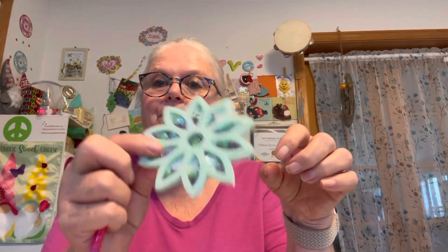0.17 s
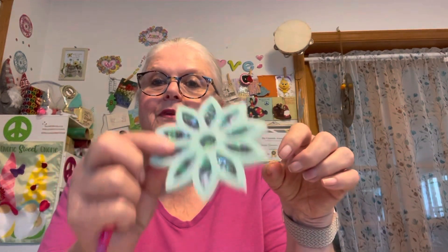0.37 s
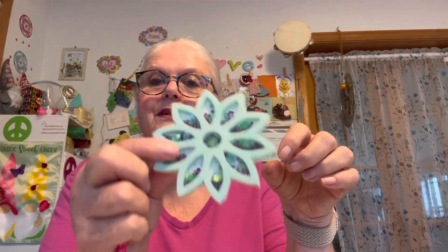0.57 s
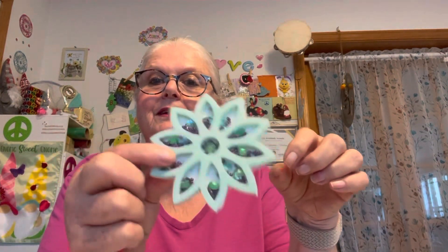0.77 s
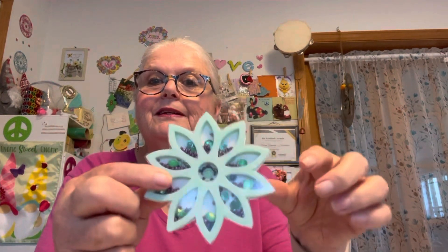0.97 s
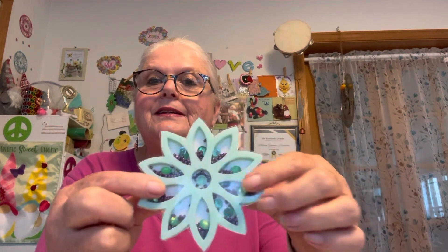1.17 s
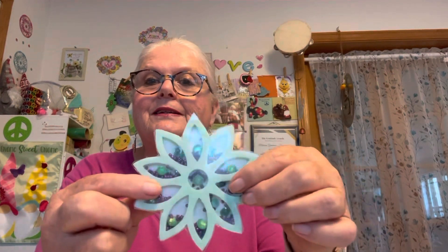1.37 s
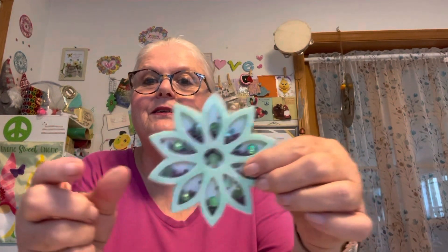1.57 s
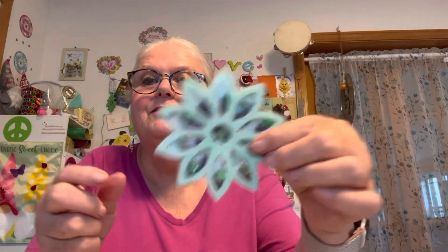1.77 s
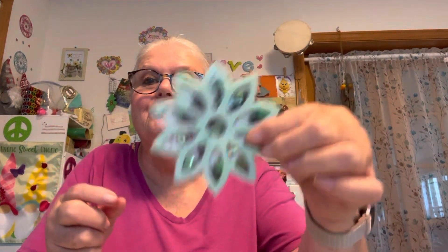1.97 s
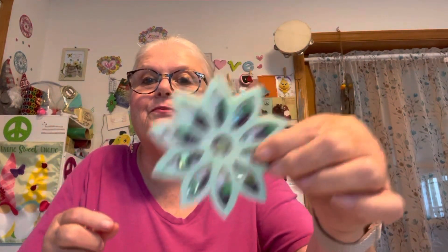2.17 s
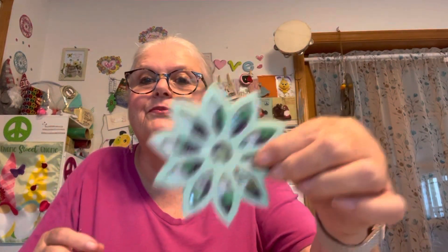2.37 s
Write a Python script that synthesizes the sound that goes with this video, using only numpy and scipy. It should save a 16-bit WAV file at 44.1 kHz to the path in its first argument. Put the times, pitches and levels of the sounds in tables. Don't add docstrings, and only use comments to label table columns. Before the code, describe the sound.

Small gems rattle inside a flat paper-and-film shaker, flicked quickly for a second, settling to a few stray ticks and a fingernail tap, then shaken again, close to a stereo microphone in a quiet room.

```python
import sys
import numpy as np
from scipy import signal
from scipy.fft import rfft, irfft, next_fast_len
from scipy.io import wavfile

SR = 44100
rng = np.random.default_rng(int(sys.argv[2]) if len(sys.argv) > 2 else 0)


def to_wav(sig):
    pcm = np.clip(np.atleast_2d(sig), -1, 1) * 32767
    pcm = np.round(pcm).astype(np.int16)
    wavfile.write(sys.argv[1], SR, pcm.T)


def to_linear_factor(level_db):
    exponent = np.asarray(level_db, float) / 20
    return 10 ** exponent


N = 106589
GRAIN = 1024


def evened(x):
    return x / np.sqrt(np.mean(x ** 2) + 1e-20)


def read(points, hz):
    f, value = np.transpose(points)
    return np.interp(np.log(hz + 1), np.log(f + 1), value)


def add(mix, s, sound):
    part = mix[..., round(s * SR):][..., :sound.shape[-1]]
    part += sound[..., :part.shape[-1]]


# (frequency [Hz], density [dB per Hz])
HISS = [(20, -40), (45, -1), (100, -13), (300, -17), (700, -28), (1400, -32), (7000, -36), (15500, -48)]
# (frequency [Hz], likeness [0-1])
HISS_LIKENESS = [(40, .85), (150, .5), (600, .4), (2000, .1), (15000, .1)]
# (frequency [Hz], level [dB], phase [rad])
HUM = [(40, -81, 1.5), (48.4, -77, 3), (59, -81, 4.5), (118.4, -85, .3)]


def floor():
    hiss_db = -71
    hz, t = np.fft.rfftfreq(N, 1 / SR), np.arange(N) / SR
    first, second = rfft(rng.standard_normal((2, N)))
    same = np.clip(read(HISS_LIKENESS, hz), 0, 1)
    other_port = same * first + np.sqrt(1 - same ** 2) * second
    hiss = irfft(np.array([first, other_port]) * to_linear_factor(read(HISS, hz)), N)
    hum = sum(to_linear_factor(db + 3) * np.sin(2 * np.pi * f * t + phase) for f, db, phase in HUM)
    return to_linear_factor(hiss_db) * evened(hiss) + hum


# (time [s], peak level [dB], frequency [Hz], length [s])
BUMPS = [(.44, -52, 150, .07), (.45, -56, 50, .08), (.39, -60, 380, .04), (.62, -60, 350, .04),
         (.83, -63, 350, .04), (1.05, -57, 140, .07), (1.1, -61, 60, .05), (1.315, -55, 290, .045),
         (1.32, -58, 90, .08), (1.805, -55, 280, .045), (1.81, -60, 120, .05), (2.0, -57, 330, .035),
         (2.195, -64, 400, .03), (2.385, -61, 350, .04)]


def bumps():
    out = np.zeros((2, N))
    for s, db, hz, length in BUMPS:
        t = np.arange(0, 2 * length, 1 / SR)
        shared, left, right = rng.standard_normal((3, 8000))
        band = signal.butter(2, [.6 * hz, 1.4 * hz], "bandpass", fs=SR, output="sos")
        noise = signal.sosfilt(band, [shared + .5 * left, shared + .5 * right])
        noise = evened(noise)[:, -len(t):]
        swell = (t / length * 3) * np.exp(1 - t / length * 3)
        add(out, s, to_linear_factor(db) * noise * swell / 2)
    return out


# (frequency [Hz], left minus right [dB])
TILT = [(300, -2), (700, -6), (1100, -4), (1700, 0.3), (3000, -.7), (4200, 2.5), (6500, 3.5), (8000, 0)]
# (frequency [Hz], likeness [0-1])
ALIKE = [(400, .6), (1000, .9), (2900, .88), (3600, .6), (5000, .45), (6000, .7), (7000, .1), (16000, .05)]


def ports(x, other):
    lag_s = .000156
    thin_hz = 1000
    size = len(x) + 64
    hz = np.fft.rfftfreq(size, 1 / SR)
    half_tilt = to_linear_factor(read(TILT, hz) / 2)
    same = np.clip(read(ALIKE, hz), 0, 1)
    right = rfft(x, size)
    left = same * right * np.exp(-2j * np.pi * hz * lag_s) + np.sqrt(1 - same ** 2) * rfft(other, size)
    radiation = 1 / np.sqrt(1 + (thin_hz / (hz + 1)) ** 4)
    return irfft(np.array([left * half_tilt, right / half_tilt]) * radiation, size)[:, :len(x)]


# (frequency [Hz], level [dB], t60 [s])
WALL_MODES = [(400, -18, .02), (830, -18, .015), (1200, -13, .01), (1750, 0, .008), (2150, 0, .008),
              (2750, 2, .011), (3500, -2, .007), (4200, -2, .006), (4600, -5, .005), (5600, -5, .006),
              (6100, -3, .007), (7300, -10, .004)]
# (frequency [Hz], level [dB])
TICK = [(300, -40), (680, -38), (1300, -10), (1900, -1), (3000, -1), (6000, -4), (8500, -6), (16000, -11)]


def click(lift_hz=0, lift_db=0):
    rise_s, tick_t60_s = .0006, .0035
    buzz_db, buzz_t60_s = -13, .035
    ring_db, mode_spread_db, detuning = 1.5, 7, .05
    t, hz = np.arange(GRAIN) / SR, np.fft.rfftfreq(GRAIN, 1 / SR)
    rise = np.minimum(t / rise_s, 1) ** 2
    decay = to_linear_factor(-60 * t / tick_t60_s) + to_linear_factor(buzz_db - 60 * t / buzz_t60_s)
    shape = rise * decay * np.cos(np.pi / 2 * t / t[-1])
    tick = irfft(rfft(rng.standard_normal((2, GRAIN)) * shape) * to_linear_factor(read(TICK, hz)), GRAIN)

    f, db, t60 = np.transpose(WALL_MODES)[:, :, None]
    detune, share, phase, other_phase = rng.standard_normal((4, len(WALL_MODES), 1))
    distance = abs(f - lift_hz)
    db = db + mode_spread_db * share + lift_db * (distance == distance.min())
    turns = f * (1 + detuning * detune) * t + np.array([phase, other_phase])
    ring = rise * (to_linear_factor(db - 60 * t / t60) * np.sin(2 * np.pi * turns)).sum(1)

    both = evened(tick) + to_linear_factor(ring_db) * evened(ring)
    both = np.roll(both, 24, axis=1)
    return ports(*(both / np.linalg.norm(both[0])))


# (time [s], level [dB], frequency [Hz], rise [s], t60 [s])
TAP = (1.2632, -18, 2900, .0018, .007)


def tap():
    out = np.zeros((2, N))
    s, db, hz, rise, t60 = TAP
    t = np.arange(GRAIN) / SR
    ring = to_linear_factor(db - 60 * t / t60) * np.minimum(t / rise, 1) ** 2 * np.sin(2 * np.pi * hz * t)
    add(out, s, ports(ring, ring))
    return out


# (time [s], peak level [dB], ring frequency [Hz])
DROPS = [(0.0343, -40, 1660), (0.1166, -45, 2970), (0.4124, -27, 1860), (0.4644, -40, 3450),
         (0.4754, -43, 5730), (0.5057, -40, 1900), (0.6883, -40, 2740), (0.7033, -39, 1820),
         (0.826, -24, 5780), (0.9148, -40, 2720), (0.9742, -47, 1700), (1.0331, -56, 2780),
         (1.2311, -55, 4950), (1.2724, -55, 3320), (1.2784, -50, 2870), (1.2864, -50, 2880),
         (1.3803, -46, 2850), (1.4262, -48, 2760), (1.476, -52, 1760), (1.488, -42, 2700),
         (1.5184, -39, 3640), (1.5289, -35, 2760), (1.5713, -39, 5630), (1.6054, -38, 2170),
         (1.6137, -33, 5880), (1.6636, -42, 2160), (1.695, -41, 2550), (2.0434, -28, 2000),
         (2.0814, -43, 1550), (2.3905, -24, 5630)]


def drops():
    out = np.zeros((2, N))
    for s, db, hz in DROPS:
        one = click(hz, lift_db=9)
        add(out, s - .001, to_linear_factor(db + 5) * one / abs(one).max())
    return out


# (peak time [s], level [dB], build-up [s per 20 dB], dying [s per 20 dB])
SWARMS = [(.015, -55, .05, .05), (.055, -49, .04, .06), (.157, -38, .025, .06), (.21, -44, .06, .07),
          (.32, -44, .02, .05), (.35, -45, .04, .06), (.418, -37, .06, .05), (.529, -50, .015, .06),
          (.565, -48, .05, .07), (.637, -38, .06, .035), (.71, -61, .08, .08), (.77, -41, .03, .05),
          (.828, -37, .02, .05), (.87, -53, .05, .12), (1.08, -66, .1, .02), (1.32, -59, .03, .08),
          (1.41, -66, .08, .04), (1.53, -54, .055, .1), (1.612, -54, .05, .05), (1.69, -56, .1, .07),
          (1.745, -41, .035, .06), (1.815, -40, .05, .06), (1.92, -48, .03, .1), (2.015, -36, .1, .05),
          (2.128, -45, .015, .05), (2.16, -45, .04, .06), (2.2, -39, .02, .09), (2.317, -44, .01, .06),
          (2.35, -46, .04, .06), (2.395, -38, .035, .06)]


def swarms(count=32):
    full_rate, full_db = 6000, -38
    density, size_db, level_db = .28, 4.6, 5.3
    t = np.arange(N) / SR
    power = np.zeros(N)
    for s, db, up, down in SWARMS:
        distance = np.where(t < s, (s - t) / up, (t - s) / down)
        power += to_linear_factor(2 * db - 40 * distance)
    busy = np.clip(power / to_linear_factor(2 * full_db), 1e-9, 1) ** (density / 2)
    rate = busy * full_rate
    struck = rng.random(N) < rate / SR
    kind = rng.integers(0, count, N)
    size = to_linear_factor(size_db * np.minimum(rng.exponential(1, N), 4)) * rng.choice([-1., 1.], N)
    hits = evened(size) * struck * np.sqrt(power * SR / rate)
    out = np.zeros((2, N))
    for k in range(count):
        out += signal.oaconvolve((hits * (kind == k))[None], click(), axes=1)[:, :N]
    return to_linear_factor(level_db) * out


def tail(x, t60, gap_s):
    t = np.arange(SR // 2) / SR
    sparse = rng.standard_normal((2, len(t))) * (rng.random((2, len(t))) < .1)
    taps = sparse * to_linear_factor(-60 * t / t60) * (t > gap_s)
    taps = signal.lfilter([.5, .5], [1], taps)
    return signal.fftconvolve(x, taps / np.linalg.norm(taps[0]), axes=1)[:, :N]


def scene():
    gems = swarms() + drops() + tap()
    room = to_linear_factor(-17.5) * tail(gems, t60=.18, gap_s=.004)
    return gems + room + bumps() + floor()


def roll_off(x):
    return signal.sosfilt(signal.butter(12, 15720, fs=SR, output="sos"), x)


def record(dry):
    edge_hz = 15750
    lean_s, lean_hz, lean_from_hz, lean_db = .00019, 11580, 7500, 24
    size = next_fast_len(N + GRAIN)
    hz = np.fft.rfftfreq(size, 1 / SR)
    swing = np.tanh(1.5 * np.cos(2 * np.pi * (hz - lean_hz) * lean_s))
    lean = to_linear_factor(lean_db * swing * np.clip((hz - lean_from_hz) / 800, 0, 1))
    left, right = rfft(dry, size) * np.clip((edge_hz - hz) / 60, 0, 1)
    mid, side = (left + right) * lean, left - right
    both = irfft(np.array([mid + side, mid - side]) / np.sqrt(2 + 2 * lean ** 2), size)[:, :N]
    return roll_off(both)


dry = scene()
out = record(dry)
to_wav(out)
```